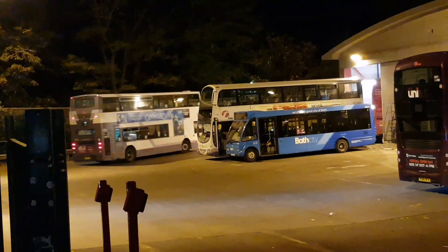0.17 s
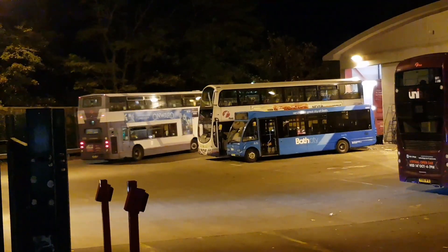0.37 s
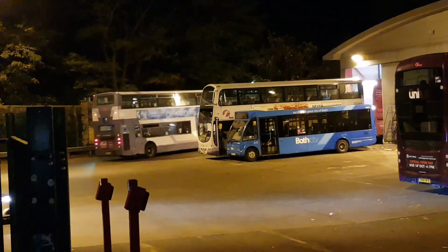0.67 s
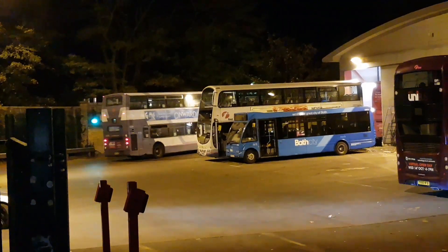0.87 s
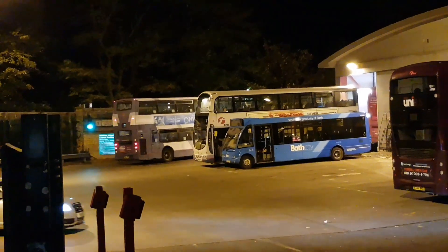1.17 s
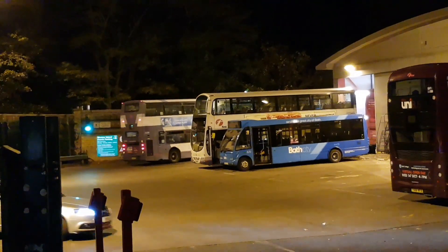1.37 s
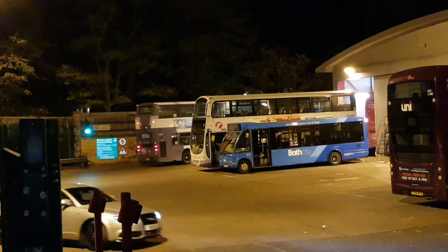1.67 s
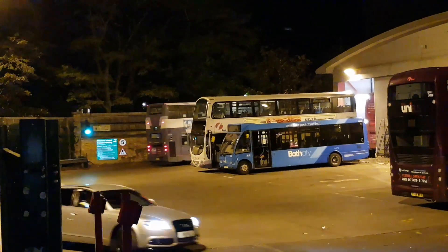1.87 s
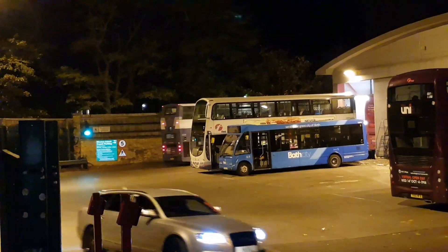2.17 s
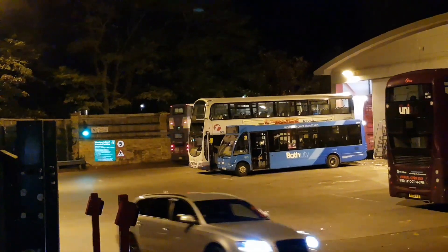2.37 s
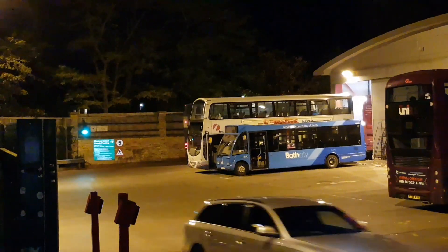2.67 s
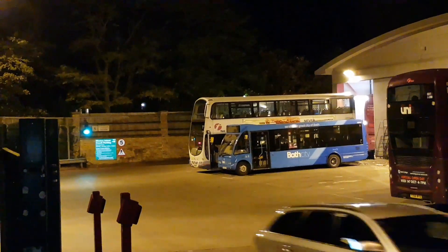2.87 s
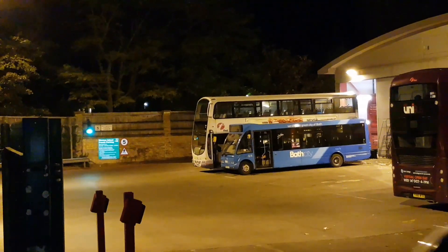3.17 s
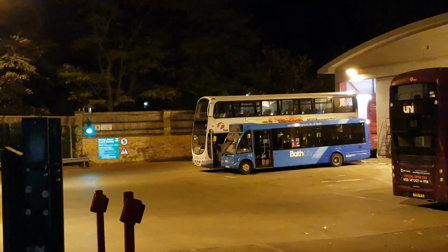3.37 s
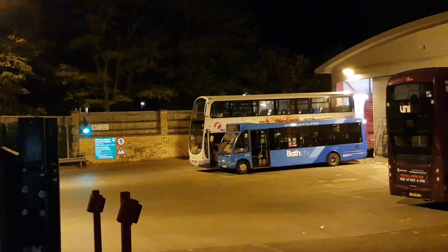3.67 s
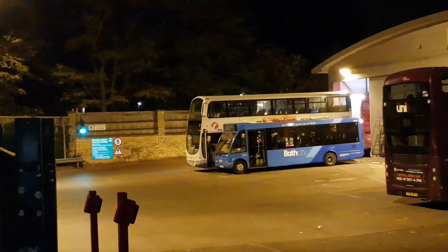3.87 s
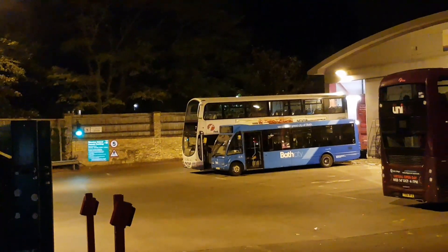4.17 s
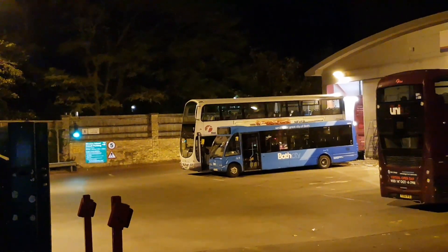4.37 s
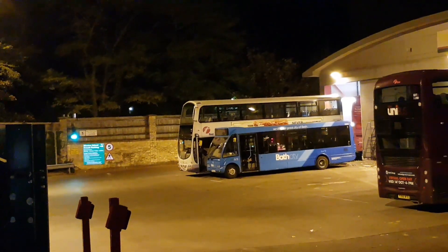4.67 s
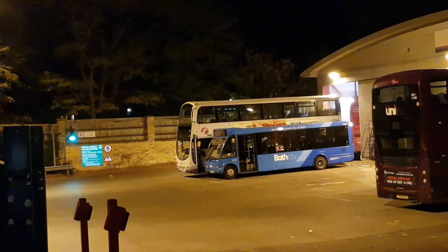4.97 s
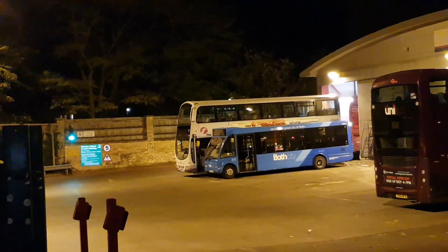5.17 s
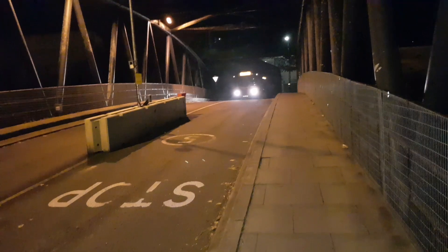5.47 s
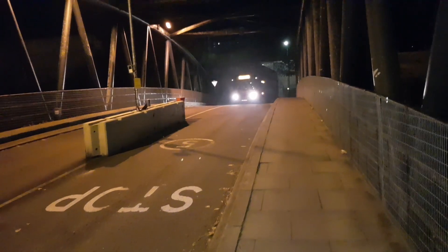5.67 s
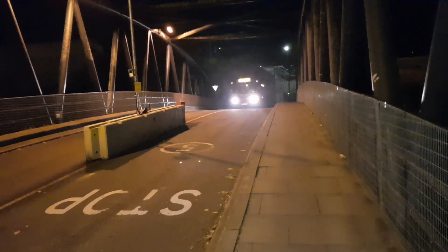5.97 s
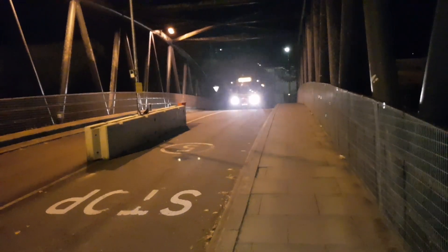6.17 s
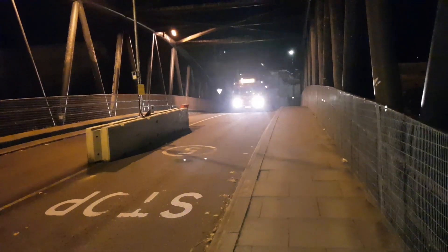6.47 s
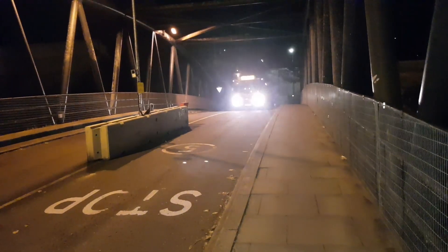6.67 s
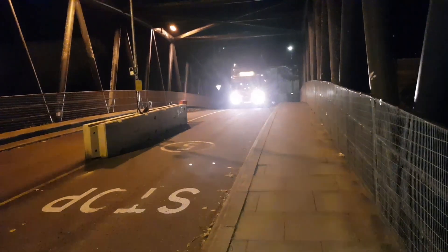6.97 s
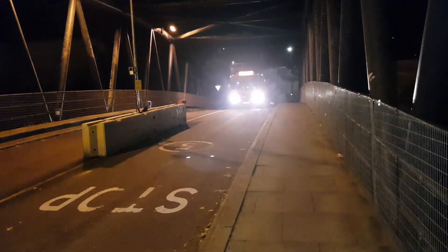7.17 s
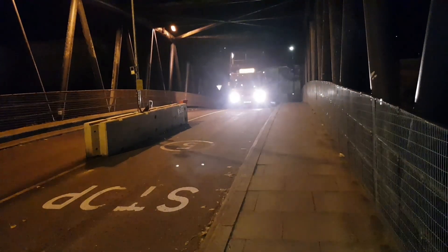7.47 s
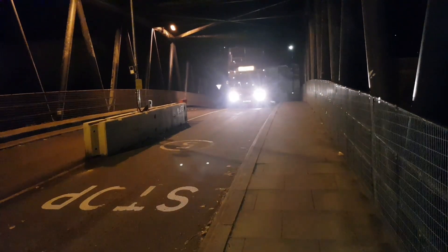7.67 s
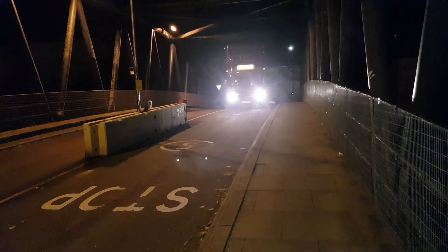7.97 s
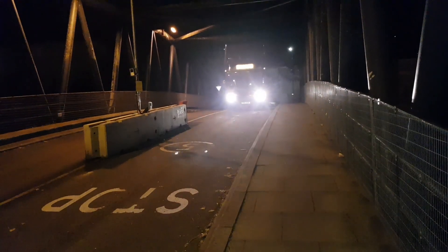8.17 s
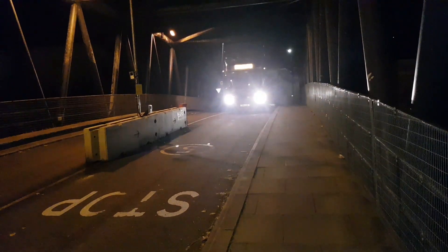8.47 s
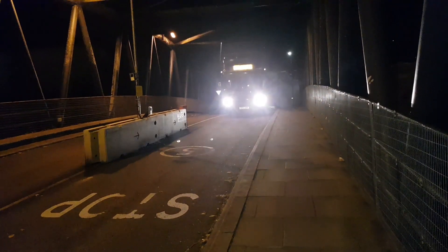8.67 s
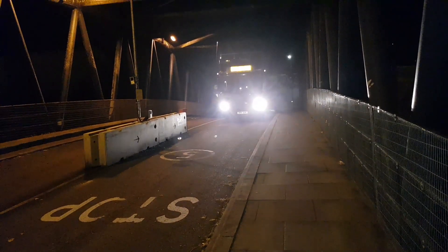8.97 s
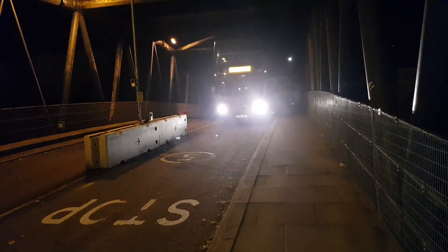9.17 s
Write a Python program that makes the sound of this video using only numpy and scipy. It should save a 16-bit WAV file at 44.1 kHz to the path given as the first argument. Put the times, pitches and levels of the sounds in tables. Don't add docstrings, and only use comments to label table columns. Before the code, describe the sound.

A bus gearbox whines off across a breezy night yard, a turbo car pulls past, then another bus drones slowly nearer with air-brake puffs.

```python
import sys
import numpy as np
from scipy import signal
from scipy.io import wavfile
from scipy.ndimage import uniform_filter1d, map_coordinates

SR = 44100
rng = np.random.default_rng(int(sys.argv[2]) if len(sys.argv) > 2 else 0)


def file_out(sig):
    cols = np.atleast_2d(sig).T
    lim = np.clip(cols, -1, 1)
    pcm = np.round(lim * 32767).astype(np.int16)
    wavfile.write(sys.argv[1], SR, pcm)


def gain_from_decibels(decibels):
    exponent = np.asarray(decibels, float) / 20
    return 10 ** exponent


N = 411441

# f/Hz, level/dB per Hz
NIGHT_COLOUR = [(3000, -17), (7000, -0.5), (9500, -6), (12500, -3.5), (15000, -24)]
NIGHT_DB = -66
# f/Hz, level/dB per Hz
WIND_COLOUR = [(20, -39), (45, 5), (120, 0), (250, -19.5), (600, -30), (1500, -66)]
# t/s, level/dB, half length/s
GUSTS = [(.95, -26, 0.13), (1.1, -34, 0.061), (1.25, -24.5, 0.2), (1.7, -25, 0.063), (2.0, -27, 0.24),
         (2.4, -34, 0.16), (3.1, -35, 0.32), (3.65, -28, 0.38), (4.4, -33, 0.16), (4.75, -31.5, 0.24),
         (5.45, -30, 0.29), (5.72, -30.5, 0.24), (6.1, -28, 0.1), (6.6, -33, 0.96), (9.1, -36, 0.19)]
CALM_DB = -54
# t/s, level/dB, left minus right/dB
SLAPS = [(0.729, -20, 16), (0.928, -24, -2), (1.123, -23, 1), (2.402, -33, 3), (2.647, -25, 9),
         (4.992, -32, -13), (5.373, -34, 1), (5.629, -23, -11), (5.779, -36, -9.4), (5.896, -33, -6),
         (6.038, -28, -0.5), (6.132, -19.5, -12), (7.368, -41.0, 8), (9.081, -37, 8), (9.13, -43, 6)]
# t/s, left minus right/dB
SHELTER = [(5.4, 2), (5.55, -6), (5.95, -11), (6.1, -1), (6.4, 1)]
# t/s, peak level/dB, f/Hz
THUDS = [(1.665, -21, 150), (1.719, -16, 170), (1.7185, -19, 700), (1.7625, -17, 330), (1.912, -17, 160),
         (3.0695, -15, 800), (3.1245, -15, 260), (3.3772, -7, 400), (5.935, -22, 90), (6.055, -21, 90),
         (6.6, -24, 90), (6.972, -19, 75), (7.103, -23, 130), (8.865, -28, 800), (8.978, -23, 110)]
# t/s, peak level/dB, f/Hz
SQUEAKS = [
    (1.519, -62, 12500),
    (4.752, -53, 5250),
    (5.1761, -47, 5400),
]
# f/Hz, likeness/0-1
PORT_LIKENESS = [(60, 0.92), (400, 0.88), (1000, 0.71), (1350, 0.77), (1550, 0.34), (1750, 0.24),
                 (2000, 0.41), (2800, 0.76), (3200, 0.28), (3700, 0.4), (6000, 0.21), (12000, 0.096)]
# start/s, end/s
CHANGE = (5.462, 5.498)
# f/Hz, threshold against the patches nearby/dB
PATCH_LIMIT = [(5000, -8), (7000, -7), (8300, -5), (9400, -3.6), (10200, -4.8), (11500, -4), (12500, -4),
               (14500, -5)]
# f/Hz, threshold/dB
TREBLE_LIMIT = [(11000, -20), (12300, -10), (14600, -2)]
# t/s, rise of threshold/dB
BUSY = [(0, 0), (.7, .6), (1.3, .6), (1.45, 2.5), (1.8, 2.5), (2.1, .7), (5.4, .7), (5.55, 2.5),
        (6.15, 2.5), (6.4, .5)]
RAGGED_DB, SHIFT = 3, 43
BASS_HZ, EDGE_HZ = 40.3, 14570

# t/s, level/dB, hiss against it/dB
BRIDGE_ROAR = [(5.5, -47, -18.5), (6.12, -46.5, -17), (6.2, -49, -18.5), (7.9, -51.5, -15),
               (9.33, -47.5, -16)]
# f/Hz, level/dB per Hz
BRIDGE_BODY = [(24, -40), (40, -8), (80, -12.5), (200, -12.5), (400, -20), (500, -29), (700, -18),
               (1150, -24.5), (1350, -30), (1520, -28), (1780, -32.5), (2050, -31), (2600, -33.5),
               (3300, -40.5), (5000, -46), (8000, -90)]
# f/Hz, level/dB per Hz
BRIDGE_HISS = [(2300, -19), (3000, -13.5), (3460, -15), (4590, -11), (6500, -15.5), (8200, -21),
               (15000, -26.5)]
# t/s, firing rate/Hz
BUS_SPEED = [(5.52, 73.15), (5.85, 75.3), (6.18, 75.23), (6.51, 70.25), (7.17, 61.2), (7.5, 53.55),
             (7.83, 52.3), (8.32, 53.07), (8.66, 55.1), (8.9, 54.27), (9.33, 54.7)]
# t/s, level/dB, half length/s
BUS_DRONES = [
    [(5.6, -32.5, 0.1), (5.8, -32, 0.086), (5.97, -32, 0.085), (6.14, -26.5, 0.034), (6.4, -38, 0.08),
     (6.62, -31.5, 0.19), (7.2, -32, 0.055), (7.385, -31, 0.037), (7.83, -32.5, 0.23), (8.32, -30.5, 0.23),
     (8.7, -28.5, 0.17), (9.25, -36.5, 0.21)],
    [(5.68, -46, 0.18), (6.15, -45, 0.2), (7.3, -42, 0.22), (7.8, -42, 0.27), (8.7, -39, 0.41),
     (9.0, -35.5, 0.12), (9.3, -35, 0.16)],
    [(5.6, -41, 0.22), (6.04, -39, 0.04), (6.65, -42, 0.28), (7.17, -44, 0.097), (8.9, -44.5, 0.87)],
]
BUS_REST_DB = -52.5
# multiple of firing rate, level against the 1.5 multiple/dB
BUS_UPPER = [(2.5, -7), (3, -3), (3.5, -18), (4, -21), (5, -13), (7, -18)]
# t/s, f/Hz, level/dB
AXLE_SLOWING = [(5.52, 367.6, -49.5), (5.77, 373.2, -49), (6.02, 381.7, -47.5), (6.27, 384.3, -54),
                (6.52, 377, -50.5), (6.77, 358.6, -47.5), (7.02, 351.5, -62)]
# t/s, f/Hz, level/dB
AXLE_ROLLING = [(7.4, 260.1, -55), (7.7, 275.5, -48.5), (8.0, 278.5, -52.5), (8.3, 282.7, -48.5),
                (8.6, 284.6, -50), (8.9, 285.7, -51), (9.2, 284.2, -50)]
# t/s, f/Hz, level/dB
BELT = [(5.5, 12080, -74), (6.2, 12050, -77), (6.8, 12060, -80), (7.1, 12080, -86)]
# t/s, f/Hz, level/dB
MOAN = [(5.85, 990, -65), (6.0, 985, -49), (6.15, 990, -50)]
# t/s, f/Hz, level/dB
GRILLE = [(5.5, 2035, -53), (7, 2080, -57), (7.6, 2150, -54.5), (9.33, 2140, -56)]
# t/s, f/Hz, level/dB
PANEL = [(5.55, 1500, -55), (7.3, 1505, -61), (9.3, 1528, -65)]
# t/s, f/Hz, level/dB
BLOCK = [(7.3, 1130, -60), (7.8, 1128, -54.5), (8.5, 1110, -50), (9.0, 1099, -58)]
# t/s, f/Hz, level/dB
BUS_FOURTH = [(8.8, 225, -49), (9.05, 220.4, -42.5), (9.33, 229.7, -43)]
# f/Hz, level/dB per Hz
AIR_JET = [(2000, -8), (3000, 1), (5000, -7), (8500, -7), (10500, -3), (12500, -1), (14500, -9)]
# start t/s, length/s, level/dB
PUFFS = [
    (6.503, 0.19, -64),
    (6.974, 0.16, -60),
    (7.342, 0.5, -55.5),
]
PUFF_DB_PER_S = 150

# t/s, left lags right/ms
YARD_PLACE = [(0, -0.091), (3, 0.023), (4.3, 0.29), (5.46, 0.27)]
# t/s, level/dB, hiss against it/dB
DEPOT_ROAR = [(0.0, -29.5, -16.5), (1.23, -31, -20.5), (3.09, -32, -18.5), (5.46, -52.5, -13.5)]
# f/Hz, level/dB per Hz
DEPOT_BODY = [(24, -43), (40, -18), (103, -4), (210, -5.5), (242, -1.5), (408, -14), (779, -14),
              (1240, -27.5), (1550, -21.5), (1750, -28), (1970, -21.5), (2780, -24), (3210, -34.5),
              (3690, -29), (5000, -59), (6500, -72), (11000, -120)]
# f/Hz, level/dB per Hz
DEPOT_HISS = [(1760, -27), (3000, -6), (3220, -16), (3710, -4.5), (5020, -11), (9450, -18.5), (12000, -22),
              (15000, -47)]
# t/s, tooth rate f/Hz
GEARBOX = [(0.0, 259.2), (0.45, 265.2), (0.6, 254.8), (0.9, 219.7), (1.35, 211.8), (1.65, 228.4),
           (2.0, 236.7), (2.7, 234.5), (3.4, 236.1), (4.0, 233.2), (4.5, 230.7), (5.45, 230.4)]
# t/s, level/dB, half length/s
WHINE_SWELLS = [(.22, -30, 0.097), (.62, -30.5, 0.15), (.88, -27, 0.23), (1.3, -21, 0.18), (2.1, -26, 0.16),
                (2.52, -23, 0.19), (2.98, -28.5, 0.084), (3.33, -29.5, 0.09), (3.55, -33, 0.091),
                (3.9, -30.5, 0.15), (4.2, -33, 0.12), (4.45, -35, 0.061), (4.95, -31, 0.2)]
# t/s, level/dB, half length/s
WHINE_OVERTONES = [
    [(.17, -38.5, 0.08), (.47, -40, 0.074), (.72, -38, 0.17), (.95, -45, .06), (1.25, -41, .17),
     (1.51, -29.5, 0.02), (1.63, -34, 0.038), (1.75, -35, 0.03), (1.97, -36, 0.13), (2.25, -38, .12),
     (2.5, -39.5, 0.13), (3.0, -41.5, 0.16), (3.38, -38.5, 0.064), (3.55, -38, .07)],
    [(.08, -48, 0.085), (.27, -47, 0.037), (.39, -47, 0.06), (.53, -43, 0.058), (1.0, -43, 0.13),
     (1.3, -52, .1), (2.15, -43.5, 0.062), (2.55, -40, 0.05)],
    [(1.2, -50, .06), (1.42, -44.5, 0.066), (1.67, -50, .07)],
]
WHINE_REST_DB, OVERTONE_REST_DB = -47, -57.5
# multiple of tooth rate, level against the third/dB
WHINE_UPPER = [(2, -8.5)]
# t/s, f/Hz, level/dB
IDLE = [(5.1, 72.3, -52), (5.22, 73.5, -36), (5.35, 72, -51), (5.46, 71.6, -48)]

# t/s, left lags right/ms
CAR_PLACE = [(1.3, -0.32), (2.1, -0.048), (2.9, 0.13), (3.3, 0.26), (3.6, 0.44), (4.4, 0.44), (5.46, 0.31)]
# t/s, level/dB, boost/0-1
CAR_PASS = [(1.3, -50, 0.45), (1.6, -44.5, 0.88), (2.0, -40.5, 0.87), (2.4, -35.5, 0.9), (3.2, -31.5, 0.77),
            (3.7, -31, 0.72), (4.2, -36, 0.34), (4.55, -39, 0), (5.46, -44.5, 0.26)]
HISS_IDLE_DB, HISS_BOOST_DB = -26.5, 21
# t/s, added hiss/dB, half length/s
DUMP = [(3.47, 3.5, 0.094)]
# f/Hz, level/dB per Hz
CAR_BODY = [(24, -39), (40, -9), (79, -4.5), (171, -7), (246, -1.5), (490, -11.5), (705, -10),
            (1030, -11.5), (1320, -13), (1750, -20), (2060, -20.5), (3340, -32), (5000, -40), (6500, -45),
            (11000, -120)]
# f/Hz, level/dB per Hz
CAR_HISS = [(1760, -37), (3000, 4), (3330, -3.5), (4390, -0.5), (6770, -3), (9160, -8.5), (10600, -5),
            (13000, -5), (14400, -6)]
# t/s, firing rate f/Hz
CAR_SPEED = [(1.8, 138.9), (1.95, 145.3), (2.4, 170), (2.85, 134.8), (3.3, 145.8), (3.45, 137.7),
             (3.7, 133), (3.9, 126.3), (4.06, 122.4), (4.65, 107.4)]
# t/s, level/dB, half length/s
CAR_BOOMS = [
    [(2.35, -35, 0.45), (3.25, -36, 0.18), (3.62, -31, 0.22), (3.8, -31, 0.08), (4.3, -25, 0.18)],
    [(1.95, -35, 0.11), (2.4, -44, 0.2), (3.17, -31, .1), (3.3, -32, 0.075), (3.47, -26, 0.076),
     (3.67, -17, 0.071), (3.84, -19.5, 0.088), (4.15, -32, 0.073)],
    [(2.6, -48, 0.18), (3.0, -34.5, 0.1), (3.49, -27, 0.054), (3.73, -25.5, 0.082), (3.87, -23, 0.059),
     (4.05, -19, 0.12), (4.25, -26.5, 0.16)],
]
CAR_REST_DB = -69
# multiple of firing rate, level against the first/dB
CAR_UNEVEN = [(.5, -7.5), (0.748, -12.5), (1.5, -19), (2.5, -8), (3.5, -13.5), (4, -19), (4.502, -25),
              (5, -17)]
CORNER_S, CORNER_DB, CORNER_FALL_S = 4.075, -12, 0.0067
RAILS_PER_S, RAILS_S, RAILS_DB = 17.24, 4.11, 5
# t/s, f/Hz, level/dB
HUM_A = [(2.1, 307.8, -44), (2.18, 313, -32.5), (2.3, 329.4, -31), (2.42, 334, -38), (2.54, 325.5, -28),
         (2.72, 314.7, -33.5), (2.85, 326.5, -65)]
# t/s, f/Hz, level/dB
HUM_B = [(2.9, 404.4, -55), (3.04, 418, -31.5), (3.25, 425.6, -51), (3.375, 429, -21.5), (3.45, 428.5, -35),
         (3.55, 426.6, -35), (3.605, 437, -26), (3.66, 416, -35)]
# t/s, f/Hz, level/dB
HUM_C = [(3.15, 305.6, -64), (3.25, 312.6, -32), (3.33, 308.7, -25), (3.42, 303, -35), (3.5, 310, -37)]
# t/s, f/Hz, level/dB
HUM_D = [(2.22, 575, -57), (2.33, 585, -35.5), (2.45, 590, -50)]
# t/s, f/Hz, level/dB
HUM_E = [(1.45, 470, -46), (1.55, 455, -36), (1.65, 444, -51)]
# t/s, f/Hz, level/dB
TURBO = [(1.6, 9700, -62), (1.9, 12500, -60), (2.09, 14450, -54), (2.2, 14720, -62), (2.39, 14520, -53),
         (2.58, 13300, -50), (2.8, 13200, -49), (3.14, 14450, -48), (3.28, 14620, -54), (3.425, 14520, -42),
         (3.49, 13600, -46), (3.56, 12700, -53), (3.71, 10900, -54), (3.85, 9950, -60)]
TURBO_LAG_S = .04
# t/s, f/Hz, level/dB
INTAKE = [(1.45, 1958, -47.5), (1.9, 1980, -44.5), (2.3, 2027, -49)]
# t/s, f/Hz, level/dB
SQUEAL = [(3.55, 4980, -58), (3.62, 4950, -43), (3.66, 4960, -58), (3.71, 5000, -45), (3.76, 4980, -60)]
# t/s, f/Hz, level/dB
RASP = [(2.9, 420, -38), (3.3, 440.5, -34.5), (3.6, 424.6, -26.5), (3.9, 400, -34.5), (4.1, 410, -33),
        (4.4, 399.7, -39.5), (4.6, 381.3, -50)]
# t/s, f/Hz, level/dB
GRIT = [(2.1, 3930, -55), (2.35, 3910, -45), (2.6, 3800, -48), (2.8, 3730, -68)]


def evened(x):
    return x / np.sqrt(np.mean(x ** 2) + 1e-20)


def curve_at(points, hz):
    f, value = np.transpose(points)
    return np.interp(np.log(hz + 1), np.log(f + 1), value)


def over_time(points, t):
    return np.interp(t, *np.transpose(points))


def place(points):
    return lambda t: over_time(points, t)


def still(value):
    return lambda t: value + 0 * t


def columns(rows, t):
    s, *cols = np.transpose(rows)
    gate = np.clip(np.minimum(t - s[0], s[-1] - t) / .04 + 1.6, 0, 1)
    return gate, [np.interp(t, s, c) for c in cols]


def drift(per_s, size=N):
    knots = rng.standard_normal(int(N / SR * per_s) + 2)
    return evened(map_coordinates(knots, [np.linspace(0, len(knots) - 1, size)], order=3))


def swells(rows, rest_db, t):
    s, db, half = np.transpose(rows)[:, :, None]
    bells = gain_from_decibels(db) * np.exp(-((t - s) / half) ** 2)
    return 10 * np.log10(gain_from_decibels(2 * rest_db) + bells.sum(0) ** 2)


def running(speed, swelling, rest_db):
    t = np.arange(speed[0][0], speed[-1][0], 256 / SR)
    hz, *more = columns(speed, t)[1]
    rests = rest_db + np.zeros(len(swelling))
    levels = [swells(rows, db, t) for rows, db in zip(swelling, rests)]
    return np.transpose([t, hz] + levels + more)


def roar(colour, level_db, lag_ms, patchy_db, flicker_db, alike=0.98):
    frames, hz = N // 256 + 5, np.fft.rfftfreq(1024, 1 / SR)
    t = np.arange(frames) * 256 / SR
    a, b, c, d, patches = rng.standard_normal((frames, 513, 5)).T
    patches = evened(uniform_filter1d(uniform_filter1d(patches, 10, 0), 10, 1))
    same = np.clip(alike * curve_at(PORT_LIKENESS, hz), 0, 1)[:, None]
    left = a + 1j * b
    early = np.exp(2j * np.pi * hz[:, None] * lag_ms(t) / 1000)
    right = same * left * early + np.sqrt(1 - same ** 2) * (c + 1j * d)
    outside = (hz < colour[0][0]) | (hz > colour[-1][0])
    shape = gain_from_decibels(np.where(outside, -120, curve_at(colour, hz)))
    shape = (shape / np.linalg.norm(shape))[:, None]
    level = gain_from_decibels(level_db(t) + patchy_db * patches + flicker_db * drift(25, frames))
    z = np.array([left, right]) * shape * level
    return signal.istft(z, nperseg=1024, noverlap=768)[1][:, :N]


def machine(rows, body, hiss, lag_ms, body_db, hiss_db, patchy_db, flicker_db):
    def level_db(t, use):
        gate, (level, bright) = columns(rows, t)
        return level + use * bright - 80 * (1 - gate)
    low = roar(body, lambda t: level_db(t, 0) + body_db, lag_ms, patchy_db, flicker_db)
    high = roar(hiss, lambda t: level_db(t, 0.93) + hiss_db, lag_ms, patchy_db, flicker_db)
    return low + high


def throb(speed, per_firing, depth):
    firing_hz = columns(speed, np.arange(N) / SR)[1][0]
    return 1 + depth * np.cos(2 * np.pi * per_firing * np.cumsum(firing_hz) / SR)


def lines(rows, multiples, lag_ms, wobble, flutter_db, flutter_per_s, follow=0, extra=()):
    t = np.arange(N) / SR
    gate, (hz, *levels) = columns(rows, t)
    turns = np.cumsum(hz * (1 + wobble * drift(30))) / SR
    turns = np.array([turns - .5 * hz * lag_ms(t) / 1000, turns])
    voices = list(zip(multiples, levels)) + [(k, levels[follow] + db) for k, db in extra]
    on, out = gate > 0, np.zeros((2, N))
    for k, db in voices:
        size = gain_from_decibels(db + 3.5 + flutter_db * drift(flutter_per_s)) * gate
        out[:, on] += size[on] * np.sin(2 * np.pi * (k * turns[:, on] + rng.random()))
    return out


def whistle(rows, width_hz, alike):
    gate, (hz, level_db) = columns(rows, np.arange(N) / SR)
    r = np.exp(-np.pi * width_hz / SR)
    noise = rng.standard_normal((3, N, 2)) @ [1, 1j]
    slow = signal.lfilter([1], [1, -2 * r, r * r], noise)
    ports = alike * slow[0] + (1 - alike) * slow[1:]
    tone = (ports * np.exp(2j * np.pi * np.cumsum(hz) / SR)).real
    return evened(tone) * gain_from_decibels(level_db) * gate


def night():
    return roar(NIGHT_COLOUR, still(NIGHT_DB), still(0), patchy_db=1.2, flicker_db=1.2)


def wind():
    def level_db(t):
        return swells(GUSTS, CALM_DB, t) - 2.5
    push = roar(WIND_COLOUR, level_db, still(0), patchy_db=1.8, flicker_db=2.2, alike=.15)
    push = push * gain_from_decibels(1.2 * np.array([drift(40), drift(40)]))
    push = push * gain_from_decibels(np.outer([.5, -.5], over_time(SHELTER, np.arange(N) / SR)))
    t = np.arange(-900, 900) / SR
    for s, db, pan_db in SLAPS:
        hz, turn = 170 + 90 * rng.random(), rng.random()
        slap = np.sin(2 * np.pi * (hz * t + turn)) * np.exp(-(t / 0.0085) ** 2)
        port, start = int(pan_db < 0), round(s * SR) - 900
        push[port, start:][:len(t)] += gain_from_decibels(db + 2.0) * slap
        push[1 - port, start:][:len(t)] -= gain_from_decibels(db + 6.0 - 1.6 * abs(pan_db)) * slap
    return push


def thuds():
    out, t = np.zeros(N), np.arange(-1000, 1000) / SR
    for s, db, hz in THUDS:
        bump = np.sin(2 * np.pi * hz * t) * np.exp(-(2.7 * hz * t) ** 2)
        out[round(s * SR) - 1000:][:len(t)] += gain_from_decibels(db) * bump
    return out


def squeaks():
    out, t = np.zeros(N), np.arange(600) / SR
    for s, db, hz in SQUEAKS:
        rub = np.sin(2 * np.pi * hz * t) * np.exp(-((t - .003) / 0.0015) ** 2)
        out[round(s * SR):][:len(t)] += gain_from_decibels(db) * rub
    return out


def puffs_db(t):
    start, length, db = np.transpose(PUFFS)[:, :, None]
    inside = np.minimum(t - start, start + length - t)
    return (db + PUFF_DB_PER_S * np.minimum(inside, 0)).max(0)


def bridge_bus():
    lag = still(-0.07)
    engine = lines(running(BUS_SPEED, BUS_DRONES, BUS_REST_DB), (1, 2, 1.5), lag, wobble=.008,
                   flutter_db=1.5, flutter_per_s=25, follow=2, extra=BUS_UPPER)
    axles = sum(lines(rows, (1,), lag, wobble=w, flutter_db=4.5, flutter_per_s=30)
                for rows, w in ((AXLE_SLOWING, .012), (AXLE_ROLLING, .03)))
    belt = whistle(BELT, 250, alike=.55)
    moan = whistle(MOAN, 27, alike=0.82)
    grille = whistle(GRILLE, 230, alike=0.5)
    ringing = whistle(PANEL, 90, alike=.5) + whistle(BLOCK, 110, alike=0.67)
    fourth = whistle(BUS_FOURTH, 40, alike=0.94)
    air = roar(AIR_JET, puffs_db, lag, patchy_db=1.5, flicker_db=.5)
    noise = machine(BRIDGE_ROAR, BRIDGE_BODY, BRIDGE_HISS, lag,
                    body_db=14.0, hiss_db=8.0, patchy_db=1.5, flicker_db=0.2)
    noise = throb(BUS_SPEED, 1, 0.048) * noise
    return engine + axles + belt + moan + grille + ringing + fourth + air + noise


def depot_bus():
    lag = place(YARD_PLACE)
    rests_db = [WHINE_REST_DB] + 3 * [OVERTONE_REST_DB]
    gears = running(GEARBOX, [WHINE_SWELLS] + WHINE_OVERTONES, rests_db)
    whine = lines(gears, (1, 3, 4, 5), lag, wobble=.006, flutter_db=1.6, flutter_per_s=30,
                  follow=1, extra=WHINE_UPPER)
    idle = lines(IDLE, (1,), lag, wobble=.01, flutter_db=1.5, flutter_per_s=15)
    noise = machine(DEPOT_ROAR, DEPOT_BODY, DEPOT_HISS, lag,
                    body_db=3, hiss_db=2.5, patchy_db=1.1, flicker_db=.6)
    return whine + idle + noise


def car_firing():
    t, hz, *levels = running(CAR_SPEED, CAR_BOOMS, CAR_REST_DB).T
    shadow_db = CORNER_DB * np.clip((t - CORNER_S) / CORNER_FALL_S, 0, 1)
    behind = t > CORNER_S + CORNER_FALL_S
    shadow_db = shadow_db + behind * RAILS_DB * np.cos(2 * np.pi * RAILS_PER_S * (t - RAILS_S))
    return np.transpose([t, hz] + [db + shadow_db for db in levels])


def turbo_spool():
    t, hz, db = running(TURBO, [], 0).T
    hz = uniform_filter1d(hz, round(TURBO_LAG_S * SR / 256), mode="nearest")
    return np.transpose([t, hz, db])


def car_passing():
    t, db, boost = running(CAR_PASS, [], 0).T
    (s, dump_db, half), = DUMP
    hiss_db = HISS_IDLE_DB + HISS_BOOST_DB * boost + dump_db * np.exp(-((t - s) / half) ** 2)
    return np.transpose([t, db, hiss_db])


def car():
    lag = place(CAR_PLACE)
    engine = lines(car_firing(), (1, 2, 3), lag, wobble=.013, flutter_db=2.9, flutter_per_s=45,
                   extra=CAR_UNEVEN)
    hums = sum(lines(rows, (1,), lag, wobble=.012, flutter_db=2, flutter_per_s=32)
               for rows in (HUM_A, HUM_B, HUM_C, HUM_D, HUM_E))
    turbo = whistle(turbo_spool(), 100, alike=.3)
    intake = whistle(INTAKE, 330, alike=1.0)
    squeal = whistle(SQUEAL, 90, alike=.6)
    rasp = whistle(RASP, 115, alike=0.65)
    grit = whistle(GRIT, 900, alike=0.44)
    noise = machine(car_passing(), CAR_BODY, CAR_HISS, lag,
                    body_db=8, hiss_db=3.0, patchy_db=2.0, flicker_db=0.14)
    noise = throb(CAR_SPEED, 0.5, 0.059) * noise
    return engine + hums + turbo + intake + squeal + rasp + grit + noise


def scene():
    first = np.arange(N) / SR < CHANGE[1] - .005
    vehicles = np.where(first, depot_bus() + car(), bridge_bus())
    return night() + wind() + thuds() + squeaks() + vehicles


def thinned(x):
    sum_and_difference = np.roll([x[0] + x[1], x[0] - x[1]], -SHIFT, axis=1) / 2
    hz, t, z = signal.stft(sum_and_difference, SR, "cosine", nperseg=2048)
    power = (abs(z[:, :1024]) ** 2).reshape(2, 128, 8, -1).mean(axis=2) + 1e-20
    hz = hz[4:1024:8]
    near = uniform_filter1d(uniform_filter1d(power, size=9, axis=1, origin=3), size=5, axis=2)
    treble = power[:, (hz > 9000) & (hz < 14000)].mean(axis=1)
    treble = uniform_filter1d(treble, size=5, axis=1)[:, None]
    busy_db = over_time(BUSY, t)
    near_db = np.where(hz < PATCH_LIMIT[0][0], -99, curve_at(PATCH_LIMIT, hz))[:, None] + busy_db
    top_db = np.where(hz < TREBLE_LIMIT[0][0], -99, curve_at(TREBLE_LIMIT, hz))[:, None]
    ragged = drift(8, len(t)) + .9 * rng.standard_normal(power.shape[1:])
    top_db = top_db + RAGGED_DB * ragged + 1.5 * busy_db
    kept = power > np.maximum(near * gain_from_decibels(2 * near_db), treble * gain_from_decibels(2 * top_db))
    z[:, :1024] *= np.repeat(kept, 8, axis=1)
    back = signal.istft(z, SR, "cosine", nperseg=2048)[1][:, :N]
    mid, side = np.roll(back, SHIFT, axis=1)
    return np.array([mid + side, mid - side])


def top_cut(x):
    return signal.sosfilt(signal.butter(12, 15690, fs=SR, output="sos"), x)


def record(dry):
    t = np.arange(N) / SR
    high_pass = signal.butter(2, BASS_HZ, "high", fs=SR, output="sos")
    dry = signal.sosfilt(high_pass, dry)
    low_pass = signal.firwin(511, EDGE_HZ, window=("kaiser", 9), fs=SR)
    limited = signal.oaconvolve(dry, low_pass[None], "same")
    opening = np.clip(np.maximum(CHANGE[0] - t, t - CHANGE[1]) / .0001, 0, 1)
    trace = gain_from_decibels(-23) * (t < CHANGE[0] + .017)
    mix = thinned(limited) * np.maximum(opening, trace)
    return top_cut(mix)


dry = scene()
out = record(dry)
file_out(out)
```